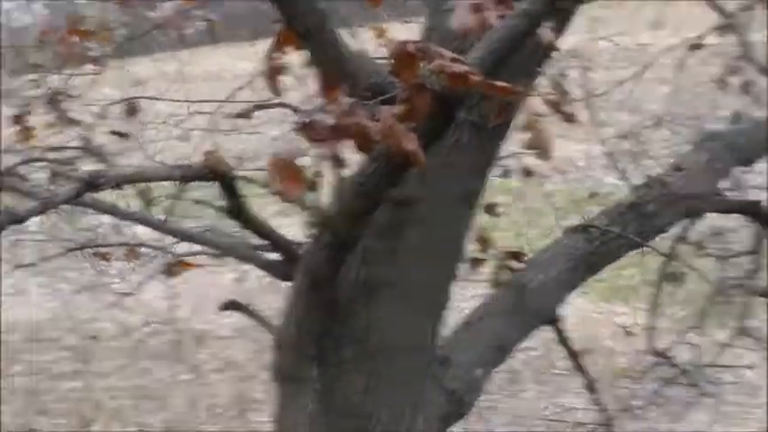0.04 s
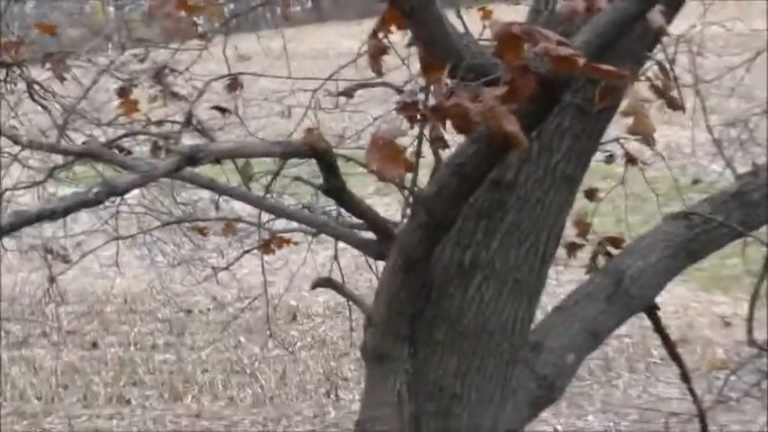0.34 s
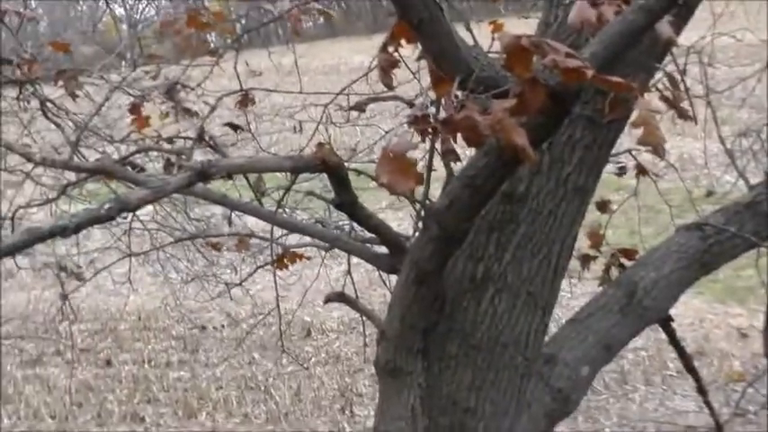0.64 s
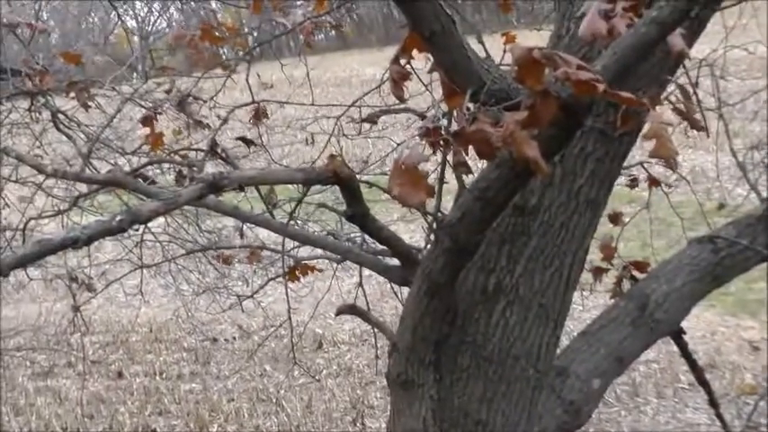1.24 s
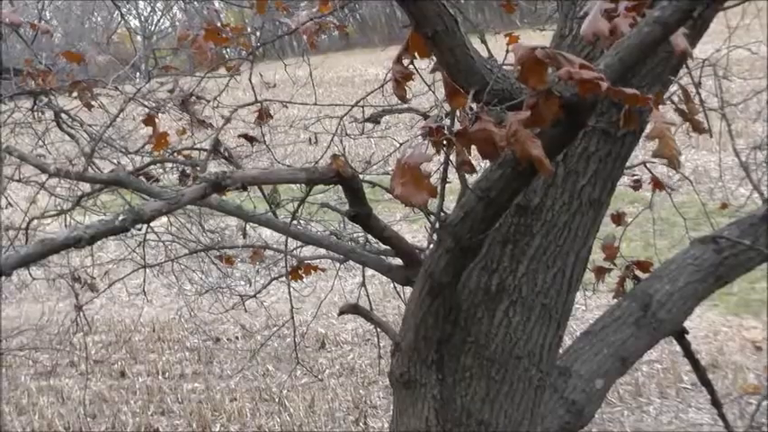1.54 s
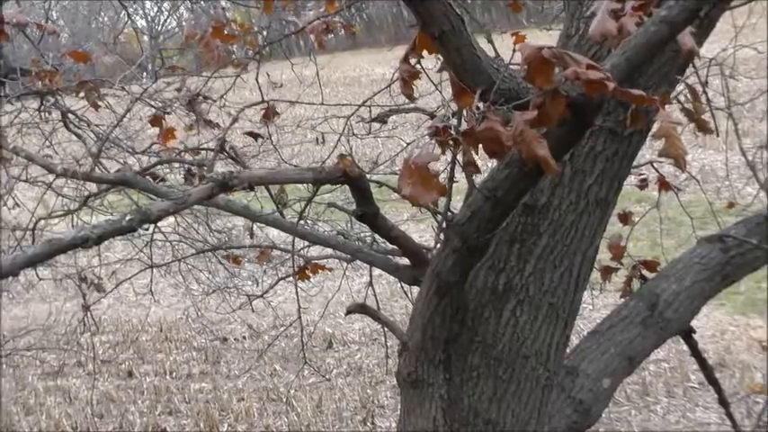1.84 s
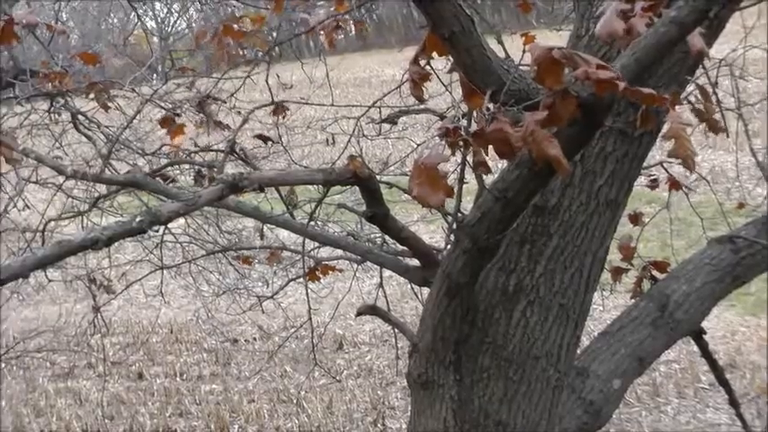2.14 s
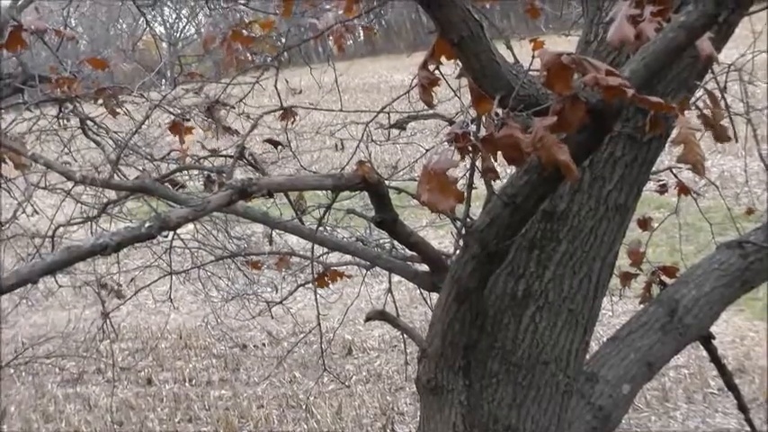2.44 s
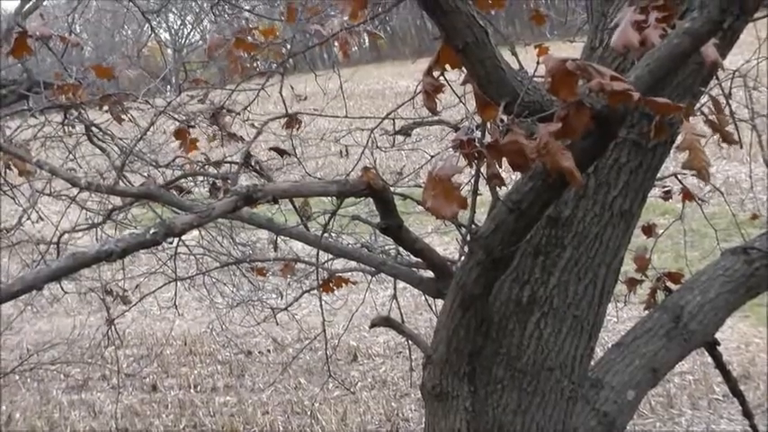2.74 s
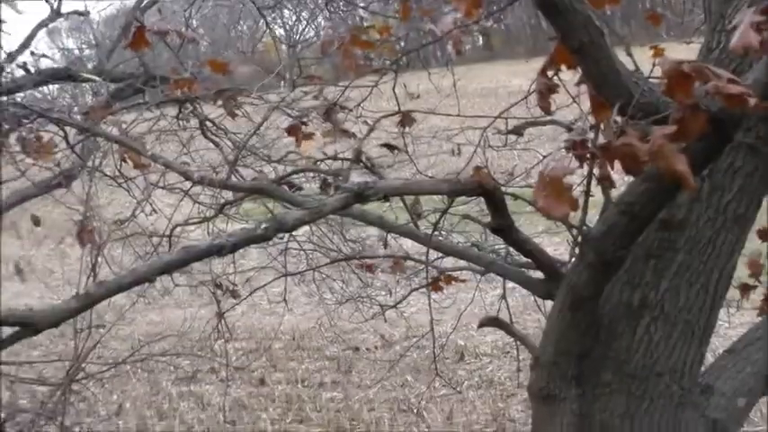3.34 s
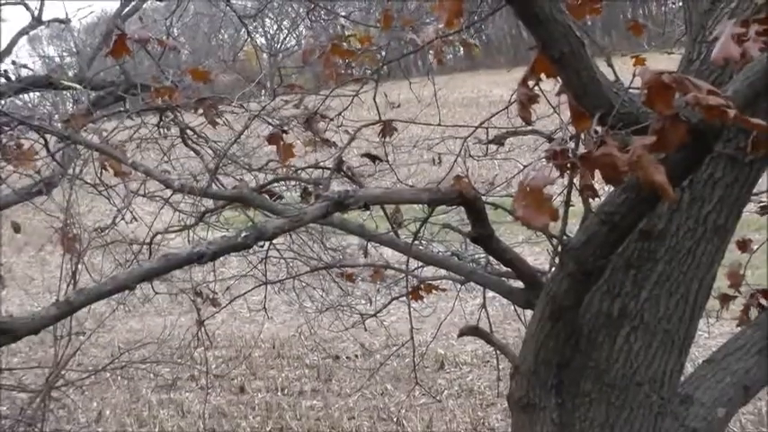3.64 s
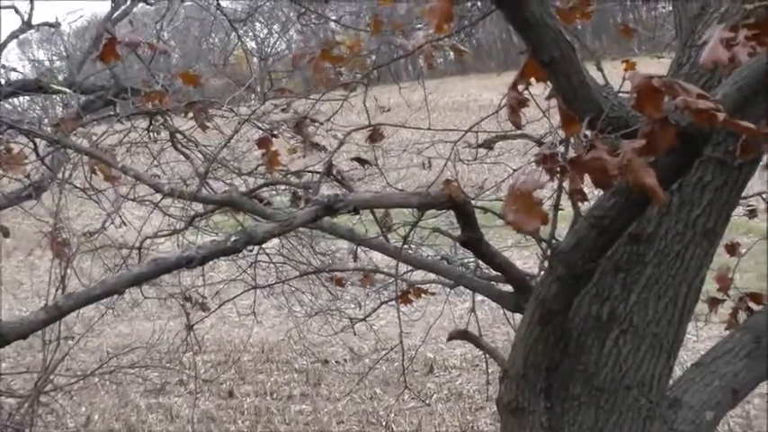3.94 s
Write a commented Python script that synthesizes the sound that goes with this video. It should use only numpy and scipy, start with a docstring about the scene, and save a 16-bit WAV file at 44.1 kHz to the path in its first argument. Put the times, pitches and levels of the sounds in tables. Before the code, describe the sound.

Two short, low deer grunts in a breezy field, with handling rustle and a final click.

```python
"""A deer grunts twice at the edge of a windy field: slow, dry pulses of the vocal folds ring its throat
and scatter among the trees. Wind hisses in dead oak leaves, and dry leaves crunch now and then.
Close to the camera's stereo microphone, clothing rustles and a hand rubs and bumps the case.
Near the end something knocks the camera with a thud and a sharp plastic snap."""
import sys
import numpy as np
from scipy import signal
from scipy.fft import rfft, irfft
from scipy.io import wavfile
from scipy.ndimage import uniform_filter1d

SR = 44100
rng = np.random.default_rng(int(sys.argv[2]) if len(sys.argv) > 2 else 0)


def inscribe(sig):
    """Save sig as 16-bit PCM at rate SR to the path in sys.argv[1].

    A 1-D sig is mono; a 2-D sig holds one channel per row.
    Samples are clipped to [-1, 1] before scaling.
    """
    pcm = np.round(np.clip(np.atleast_2d(sig).T, -1, 1) * 32767)
    wavfile.write(sys.argv[1], SR, pcm.astype(np.int16))


N = 4 * SR

# The course of the deer's voice, one list a grunt. Each row: time in seconds, pulses per second,
# relative level in dB, mouth opening from 0 to 1, brightness in dB.
GRUNTS = [
    [(1.3491, 43.5, -5, 0, 5), (1.371, 48.5, -.5, 0, 1.5), (1.40, 56, 0, .1, -2.5),
     (1.435, 44, -3.5, .2, -1.5), (1.46, 54.5, -2, .1, -1.5), (1.499, 38, -3, 0, -8)],
    [(2.5806, 46.5, -1, .9, 1), (2.61, 47, 0, 1, 1), (2.645, 42.5, 1, 1, 1), (2.669, 48.5, 0, .8, -1),
     (2.689, 53.5, 2.5, .9, -1), (2.712, 59, -2, .4, -5)],
]
GRUNT_DB, SHIMMER_DB, VOICE_TOP_HZ = 4.5, 2, 3930
SCATTER_DB, SCATTER_S = -6.5, 0.015


def deer():
    """Out at the field's edge, uneven snaps of the vocal folds scatter off trunks and branches."""
    voice = np.zeros(N)
    for grunt in GRUNTS:
        times, rate, *controls = np.array(grunt).T
        t = np.arange(times[0], times[-1], 1 / SR)
        cycle = np.floor(np.cumsum(np.interp(t, times, rate)) / SR)
        for start in t[np.diff(cycle, prepend=-1) > 0]:
            db, mouth, bright_db = (np.interp(start, times, control) for control in controls)
            pulse = undb(db + SHIMMER_DB * rng.standard_normal()) * throat_pulse(mouth, bright_db)
            voice[int(start * SR):][:len(pulse)] += pulse
    voice = signal.sosfiltfilt(signal.butter(6, VOICE_TOP_HZ, fs=SR, output="sos"), voice)
    scatter = stereo(smear(voice, SCATTER_S), smear(voice, SCATTER_S))
    return undb(GRUNT_DB) * (voice + undb(SCATTER_DB) * scatter)


# Throat resonances. Each row: pitch in Hz with the mouth closed, then open, width in Hz, gain in dB.
THROAT_MODES = [(1234, 1258, 45, 5.5), (2150, 2160, 190, -5), (2460, 2320, 170, -5.5),
                (2900, 3200, 200, -13), (3300, 3400, 140, -6.5)]
THROAT_JITTER, THROAT_SHIMMER_DB = 0.0082, 1.5
FOLD_HZ, FOLD_WIDTH_HZ, FOLD_CLICK_DB = 2080, 2400, -23.5


def throat_pulse(mouth, bright_db):
    """One snap of the vocal folds rings the throat, a little different every time."""
    closed, opened, width, db = np.array(THROAT_MODES).T
    jitter, shimmer = rng.standard_normal((2, len(THROAT_MODES)))
    hz = (closed + mouth * (opened - closed)) * (1 + THROAT_JITTER * jitter)
    db = db + THROAT_SHIMMER_DB * shimmer
    db[1:] += bright_db
    modes = [*zip(hz, width, db), (FOLD_HZ, FOLD_WIDTH_HZ, FOLD_CLICK_DB)]
    return ring(-signal.unit_impulse(SR // 20), modes)


# Contacts on the camera. Each row: start in seconds, relative levels of thud, case and snap in dB.
CONTACTS = [(3.7943, 7, -11, -38), (3.8014, 18.5, 5.5, -28), (3.803, 32, -12, -8), (3.8056, -17, -10, -9),
            (3.8105, -12, -15, 4.5), (3.8123, 17.5, 1, -10), (3.8141, 10, -8, -4)]
# Resonances of the thud, the case and the snap. Each row: pitch in Hz, width in Hz, gain in dB.
THUD_MODES = [(169.3, 82, 13.5)]
CASE_MODES = [(220, 11, 10.5), (503, 35, 4), (687, 82, 2.5), (806, 28, 1.5), (885, 37, -11),
              (1220, 120, -12), (1590, 240, -13)]
SNAP_MODES = [(2740, 196, 10), (3100, 150, 4), (3900, 1500, -3), (5200, 700, -6), (6390, 570, 6.5),
              (7700, 700, -7), (9600, 600, -4.5)]
CASE_DB, THUD_TAIL_DB, CASE_TAIL_DB, BODY_TAIL_S = 21.5, -13, -10.5, 0.023
SNAP_DB, SNAP_S, SNAP_TAIL_DB, SNAP_TAIL_S = 6, 0.00059, -13, 0.019
CASE_TOP_HZ, SNAP_TOP_HZ, SNAP_TAIL_HZ = 2500, 11000, 5500


def knock():
    """Right at the microphone, quick contacts thud, ring the case and snap; the body shudders on."""
    starts, thud_db, case_db, snap_db = np.array(CONTACTS).T
    pushes = clicks(starts, undb(thud_db))
    thud = ring(pushes + undb(THUD_TAIL_DB) * smear(pushes, BODY_TAIL_S), THUD_MODES)
    thud = ring(thud, [(hz, width, 0) for hz, width, _ in THUD_MODES])  # narrows the thud's band
    taps = clicks(starts, undb(case_db + CASE_DB))
    case = ring(taps + undb(CASE_TAIL_DB) * smear(taps, BODY_TAIL_S), CASE_MODES)
    case = signal.lfilter(*signal.butter(2, CASE_TOP_HZ, fs=SR), case)
    hits = clicks(starts, undb(snap_db + SNAP_DB))
    dull = undb(SNAP_TAIL_DB) * signal.lfilter(*signal.butter(1, SNAP_TAIL_HZ, fs=SR), hits)
    snap = stereo(*(ring(smear(hits, SNAP_S) + smear(dull, SNAP_TAIL_S), SNAP_MODES) for _ in range(2)))
    snap = signal.lfilter(*signal.butter(3, SNAP_TOP_HZ, fs=SR), snap)
    return snap + delay_left(thud, lag_s=0.00022) + delay_left(case, lag_s=-0.00022)


# The hand's rubbing. Each row: time in seconds, relative level in dB.
RUB_LEVELS = [(0, -66), (.52, -51.5), (.72, -42), (.82, -41), (1.0, -42), (1.25, -41), (1.35, -48),
              (1.58, -45), (1.87, -52.5), (2.03, -41), (2.35, -39.5), (2.45, -48), (2.66, -48), (2.76, -39),
              (2.95, -43), (3.27, -41), (3.48, -55), (3.57, -39), (3.68, -45), (4, -45)]
# Its spectrum. Each row: frequency in Hz, gain in dB.
RUB_COLOUR = [(40, -18), (110, -4), (200, 4), (350, 2), (500, 3.5), (800, -8.5), (1250, -9), (1900, -18.5),
              (4000, -20.5), (12000, -50)]
# Finger bumps. Each row: start in seconds, pitch in Hz, envelope peak in dB.
BUMPS = [(.825, 436, -30), (.896, 696, -32), (1.094, 165, -29), (1.224, 330, -27.5), (1.292, 730, -26.5),
         (1.518, 374, -30.5), (2.309, 430, -34), (2.341, 640, -24.5), (2.3605, 524, -23),
         (2.3963, 750, -24.5), (2.885, 1150, -30), (2.932, 377, -28), (2.957, 380, -27.5),
         (2.977, 1340, -31), (3.182, 203, -24), (3.558, 537, -28)]
RUB_DB, BUMP_RISE_CYCLES = 1, 0.7


def hand():
    """Beside the microphone, the hand rubs the case in uneven slips and the fingers bump it dully."""
    t = np.arange(N) / SR
    rub_db = RUB_DB + np.interp(t, *np.array(RUB_LEVELS).T)
    rub = undb(rub_db) * texture(RUB_COLOUR, grain_db=2.5, grain_rate=160)
    bumps = np.zeros(N)
    for start, hz, db in BUMPS:
        cycles = np.clip(t - start, 0, 20 / hz) * hz
        age = cycles / BUMP_RISE_CYCLES
        bumps += undb(db) * age * np.exp(1 - age) * np.sin(2 * np.pi * cycles)
    return rub + bumps


# Swishes of fabric. Each row: peak time, rise and fall in seconds, level in dB.
RUSTLES = [(.11, .02, 0.026, -54), (.66, .03, 0.032, -46.5), (.96, 0.08, 0.054, -44.5),
           (1.07, 0.056, 0.05, -40), (1.19, 0.033, 0.021, -43), (1.39, 0.14, 0.089, -46),
           (1.68, 0.032, 0.02, -49), (1.84, 0.013, 0.036, -45), (2.055, 0.012, 0.055, -42),
           (2.25, .03, 0.034, -45), (2.56, 0.026, 0.02, -41), (2.73, 0.065, .06, -47),
           (2.95, 0.19, .1, -47), (3.24, 0.064, 0.058, -39.5), (3.54, 0.026, 0.03, -40)]
# Their spectrum. Each row: frequency in Hz, gain in dB.
RUSTLE_COLOUR = [(200, -14), (900, -1.5), (1900, -7), (2900, 2), (3900, -2.5), (5000, 4.5), (6300, 3.5),
                 (8500, -7.5), (11000, -21.5), (15500, -30)]
# Sleeve scuffs. Each row: peak time and half-length in seconds, level in dB, pitch in Hz.
SCUFFS = [(0.109, 0.017, -41.5, 617), (0.766, 0.068, -49, 398), (0.98, 0.055, -44, 910),
          (1.255, 0.049, -41.5, 366), (2.531, 0.013, -38.5, 1080), (2.78, 0.079, -45.5, 510),
          (2.943, 0.014, -37, 377), (2.985, .011, -40, 1230), (3.07, 0.023, -40, 520),
          (3.246, 0.029, -46, 990), (3.61, 0.028, -49, 480)]
# Resonances all scuffs share. Each row: pitch in Hz, width in Hz, gain in dB.
SCUFF_MODES = [(820, 230, -13), (1100, 180, -9), (1460, 57, -22)]
SCUFF_WIDTH_HZ, SCUFF_RING_DB = 105, 8


def clothing():
    """Close by, fabric swishes and a sleeve scuffs, each scuff with its own hollow pitch."""
    t = np.arange(N) / SR
    power = sum(undb(db) ** 2 * np.exp(-((t - peak) / np.where(t < peak, rise, fall)) ** 2)
                for peak, rise, fall, db in RUSTLES)
    swish = np.sqrt(power) * texture(RUSTLE_COLOUR, grain_db=3.0, grain_rate=450)
    slips = undb(4.5 * drift(130)) * rng.standard_normal((2, N))
    cloth = ring(slips, SCUFF_MODES)
    scuffs = np.zeros((2, N))
    for peak, half_length, db, hz in SCUFFS:
        hollow = ring(slips, [(hz, SCUFF_WIDTH_HZ, SCUFF_RING_DB)])
        scuffs += undb(db) * np.exp(-((t - peak) / half_length) ** 2) * unit(cloth + hollow)
    return swish + stereo(*scuffs)


# Breaking leaves. Each row: start in seconds, level in dB, decay in seconds, extra treble in dB.
CRUNCHES = [(1.0163, -34, 0.0043, 0), (1.0496, -36, .005, 0), (1.078, -40, 0.0064, -3),
            (1.845, -41, 0.0086, 0), (2.0468, -30, 0.0096, 1), (2.5322, -35, 0.0056, 0),
            (2.5591, -37.5, 0.0035, -3), (3.1974, -34, .002, 21), (3.538, -31, 0.0054, -2)]
# Their spectrum. Each row: frequency in Hz, gain in dB.
CRUNCH_COLOUR = [(500, -16), (1800, -4), (3000, 5), (5500, 9), (8000, -3.5), (11000, -26), (15500, -24)]


def leaf_crunches():
    """Dry leaves break in sudden little bursts of crackle."""
    t = np.arange(N) / SR
    crackle = texture(CRUNCH_COLOUR, grain_db=7.0, grain_rate=2500)
    treble = signal.lfilter(*signal.butter(2, 12000, "high", fs=SR), crackle)
    bursts = np.zeros((2, N))
    for start, db, decay, treble_db in CRUNCHES:
        envelope = undb(db) * (t >= start) * np.exp(-np.abs(t - start) / decay)
        bursts += envelope * (crackle + (undb(treble_db) - 1) * treble)
    return bursts


# Spectra of the wind's rumble and the oak leaves' hiss. Each row: frequency in Hz, gain in dB.
RUMBLE_COLOUR = [(20, -38), (45, -15.5), (70, -7.5), (100, -1.5), (170, -1.5), (260, 0.5), (370, -7.5),
                 (550, -7.5), (800, -8.5), (1300, -19.5), (3000, -40)]
HISS_COLOUR = [(300, -11), (1000, -2.5), (1400, 0), (1900, -7), (2500, 1), (3200, 2), (3900, -3),
               (4800, 1.5), (6400, 0.5), (7500, -4.5), (9000, -10), (11000, -17), (15500, -24)]
RUMBLE_DB, HISS_DB, HUM_DB, BUFFET_DB = -43, -45, -45.5, -85


def wind():
    """Wind rumbles over the field, hisses in leaves, sets the case humming and brushes the microphone."""
    rumble = undb(RUMBLE_DB + 0.69 * drift(6.13)) * texture(RUMBLE_COLOUR, grain_db=1.0, grain_rate=35)
    hum_modes = [(216, 18, 2), (286, 16, -3)]
    hum = undb(HUM_DB) * stereo(*(unit(ring(rng.standard_normal(N), hum_modes)) for _ in range(2)))
    hiss = undb(HISS_DB + 0.38 * drift(7.3)) * texture(HISS_COLOUR, grain_db=1.14, grain_rate=650)
    buffet_colour = [(25, 4), (50, -6), (120, -20), (600, -60)]
    buffet = np.array([unit(colour(rng.standard_normal(N), buffet_colour)) for _ in range(2)])
    return rumble + hum + hiss + undb(BUFFET_DB) * buffet


# The microphone's stereo width. Each row: frequency in Hz, gain of the side signal in dB.
MIC_WIDTH = [(25, -3), (60, -13), (200, -18.5), (330, -14), (520, -12.5), (1000, -6), (2000, -7.5),
             (3200, -10), (4500, -29.5), (6300, -22), (9000, -4.5), (13000, -2.5)]


def stereo(mid, side):
    """Left and right, with the microphone's width in each band."""
    return mid + colour(side, MIC_WIDTH) * np.array([[1], [-1]])


def delay_left(x, lag_s):
    """Stereo pair with the left behind the right; a negative lag puts it ahead."""
    t = np.arange(N) / SR
    return np.array([np.interp(t - lag_s / 2, t, x), np.interp(t + lag_s / 2, t, x)])


def texture(points, grain_db, grain_rate):
    """Coloured stereo noise of rms near 1, in grains of uneven strength."""
    grains = undb(grain_db * drift(grain_rate))
    return stereo(*(unit(colour(grains * rng.standard_normal(N), points)) for _ in range(2)))


def colour(x, points):
    """Filter by a spectrum of (Hz, dB) points."""
    hz, db = np.array(points).T
    gain_db = np.interp(np.log(np.fft.rfftfreq(N, 1 / SR) + 1), np.log(hz), db)
    return irfft(rfft(x) * undb(gain_db), N)


def ring(x, modes):
    """Pass through parallel resonances (Hz, width in Hz, dB)."""
    return sum(undb(db) * signal.lfilter(*signal.iirpeak(hz, hz / width, fs=SR), x)
               for hz, width, db in modes)


def smear(x, decay_s):
    """Spread every impulse into a fading spray of unit energy."""
    t = np.arange(SR // 10) / SR
    spray = rng.standard_normal(len(t)) * np.exp(-t / decay_s)
    return signal.fftconvolve(x, spray / np.linalg.norm(spray))[:N]


def clicks(times, sizes):
    """Single impulses at the given times."""
    return np.bincount(np.round(np.asarray(times) * SR).astype(int), sizes, N)[:N]


def drift(rate_hz):
    """Smooth random drift of rms 1."""
    step = int(SR / rate_hz)
    return unit(uniform_filter1d(np.repeat(rng.standard_normal(N // step + 1), step), step)[:N])


def undb(db):
    """Decibels to gain."""
    return 10 ** (np.asarray(db) / 20)


def unit(x):
    """Scale to rms 1."""
    return x / np.sqrt(np.mean(x ** 2))


def scene():
    """The deer, the field and the close handling noise as they reach the microphone."""
    return deer() + wind() + clothing() + leaf_crunches() + hand() + knock()


TOP_HZ = 15850


def record(dry):
    """The camera cuts the highest treble steeply."""
    return signal.sosfilt(signal.ellip(10, .1, 90, TOP_HZ, fs=SR, output="sos"), dry)


dry = scene()
out = record(dry)
inscribe(out)
```